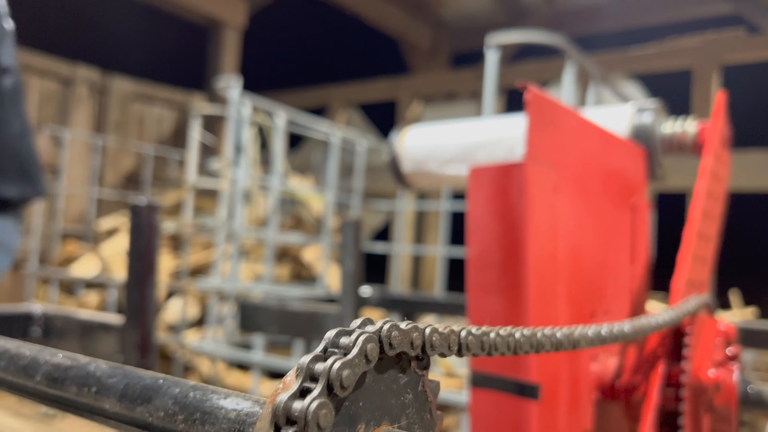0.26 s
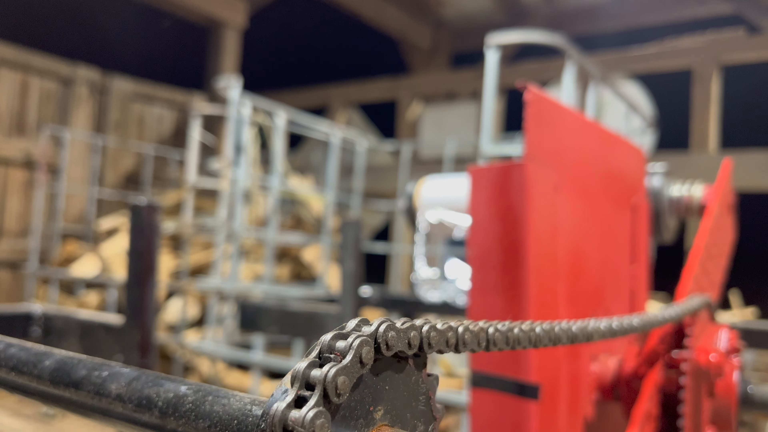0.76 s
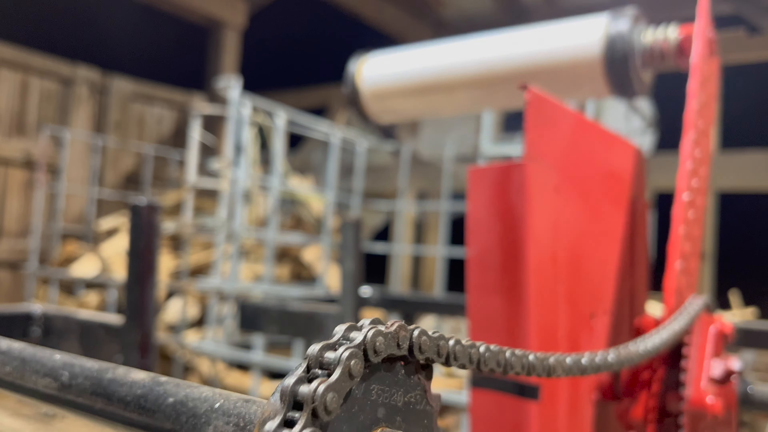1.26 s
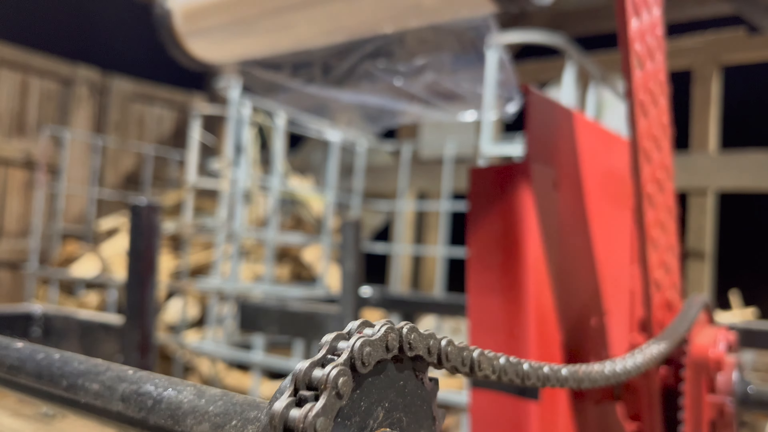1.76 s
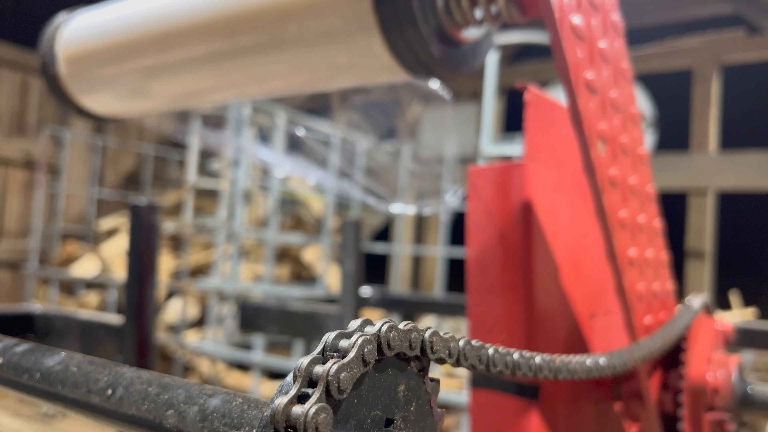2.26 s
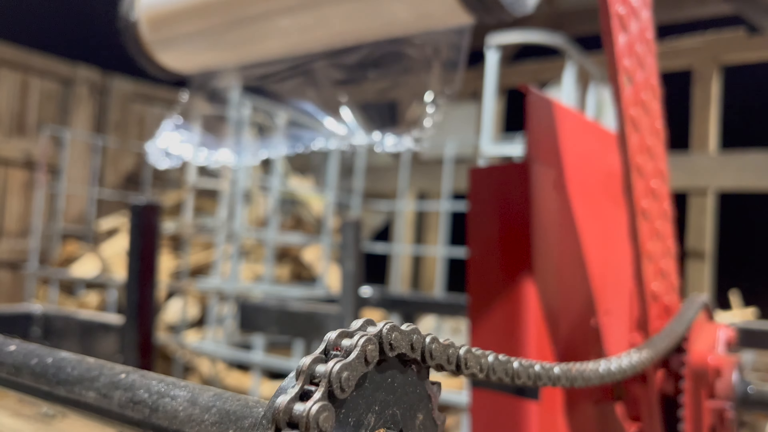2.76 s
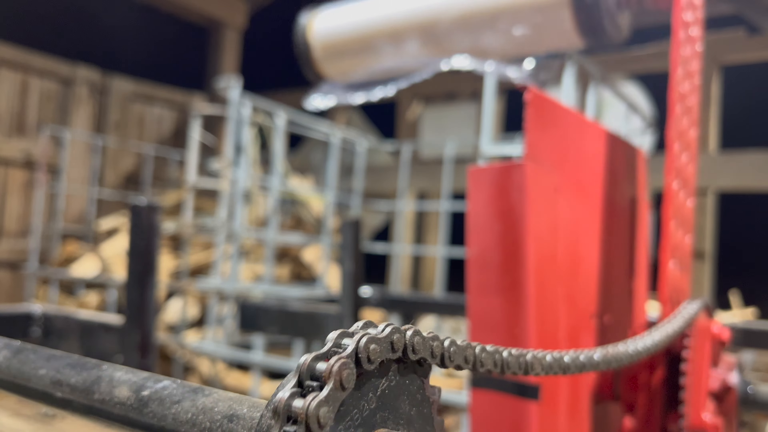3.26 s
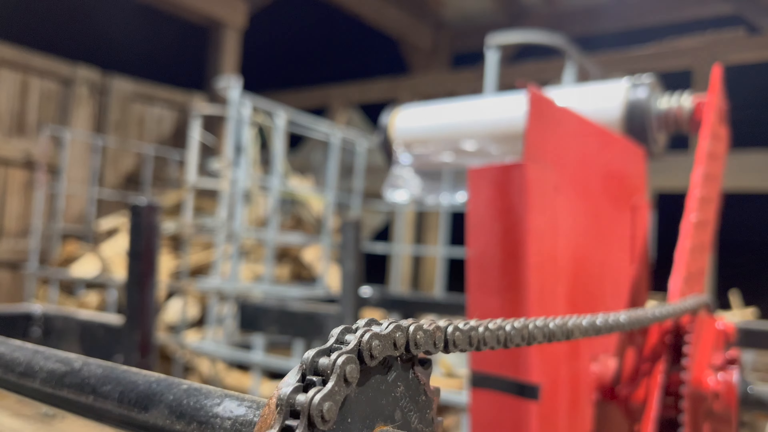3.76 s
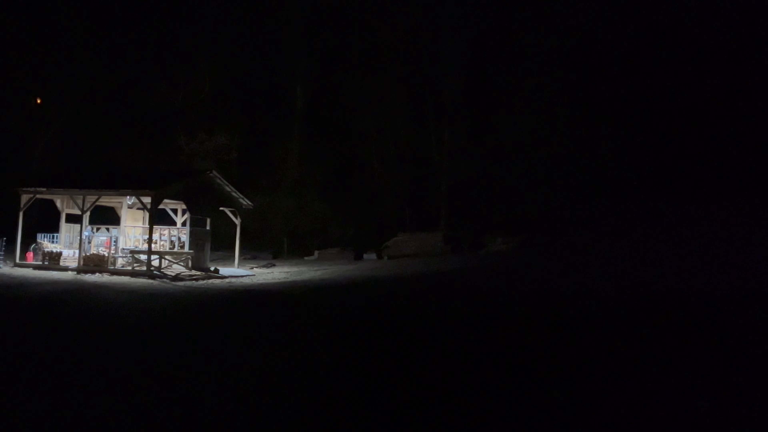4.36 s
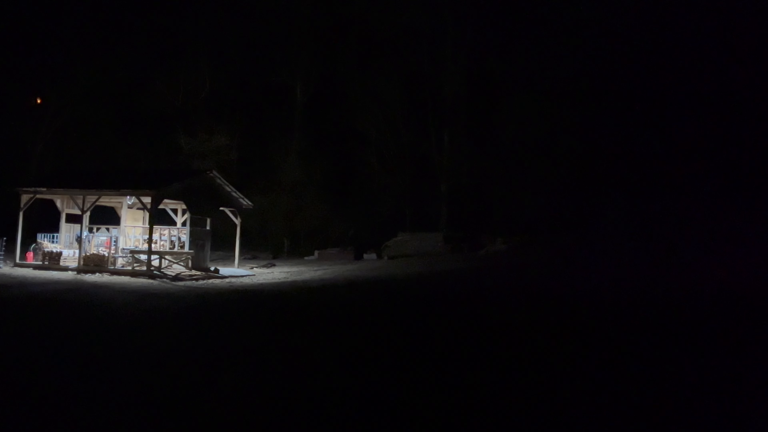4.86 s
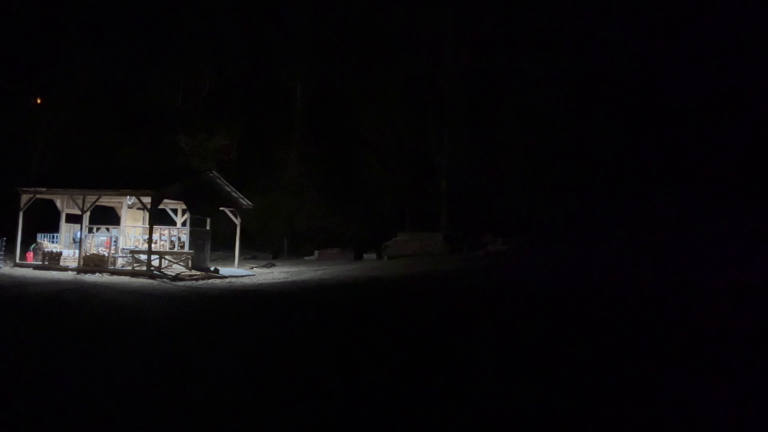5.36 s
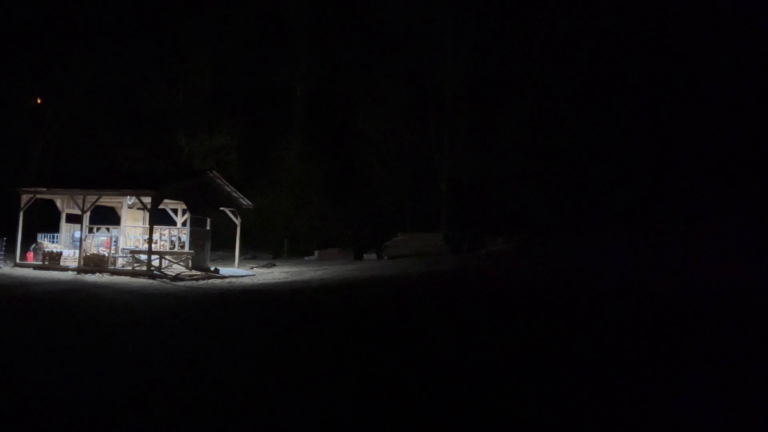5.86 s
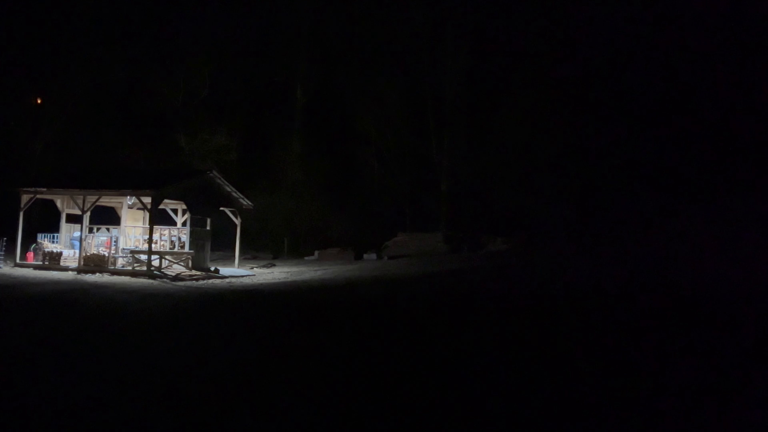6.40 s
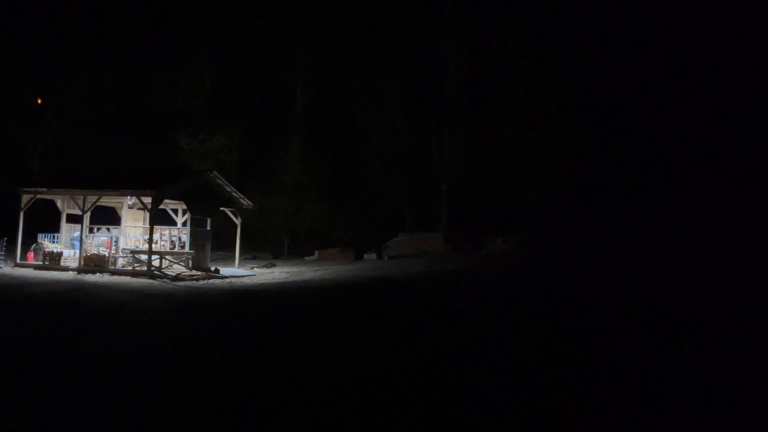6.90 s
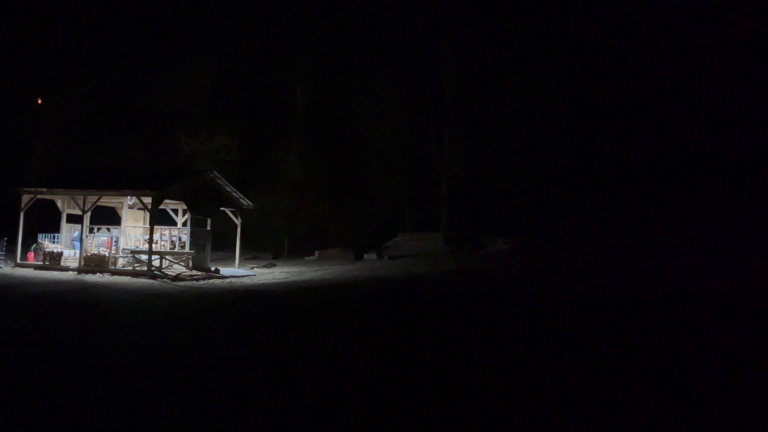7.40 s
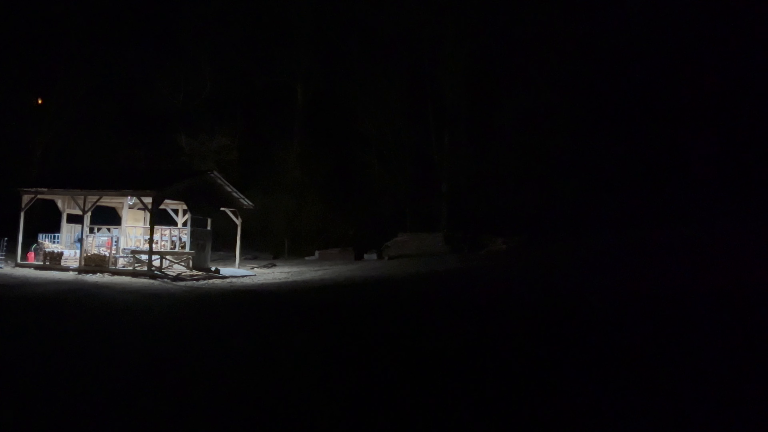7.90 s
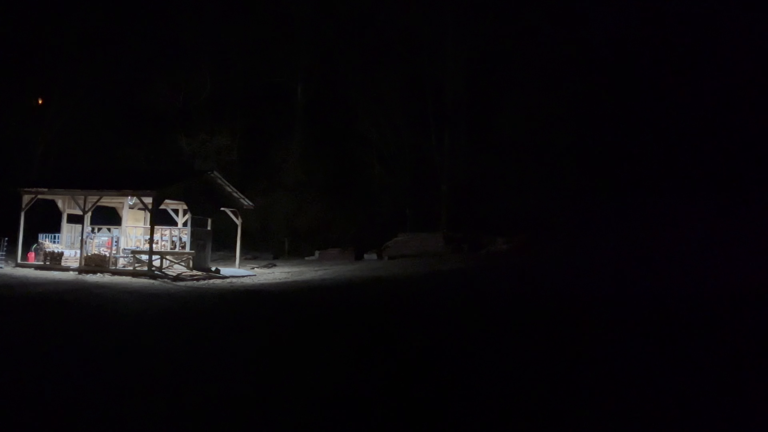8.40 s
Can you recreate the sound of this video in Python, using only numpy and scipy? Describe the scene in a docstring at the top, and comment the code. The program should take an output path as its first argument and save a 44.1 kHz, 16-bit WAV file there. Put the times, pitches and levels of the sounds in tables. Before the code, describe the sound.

In an open timber barn, film rustles quietly over a nearby bundling lever, broken early by a bright snap and heavy clunk. Midway the sound changes abruptly to firewood handling: a strong wood-on-steel clang, scattered knocks and bark crackle, a cluster of short rasping squeaks, then a duller metallic bong and final hollow tocks. Stereo pickup, faint low rumble, short reverberation.

```python
"""Split logs are knocked into a steel cradle, which rings, and shoved together with short squeaky scrapes,
as firewood is bundled in an open timber barn; before that, stretch film rustles and a bundler clunks.
Blows excite damped modes of wood, frame and steel; film and bark are streams of filtered clicks;
scrapes are stick-slip pulses through resonances. A low noise rumble lies under it all."""
import sys
import numpy as np
from scipy import signal
from scipy.fft import rfft, irfft, next_fast_len
from scipy.io import wavfile
from scipy.ndimage import map_coordinates

SR = 44100
rng = np.random.default_rng(int(sys.argv[2]) if len(sys.argv) > 2 else 0)


def pcm_store(signal):
    """Save signal as 16-bit PCM."""
    levels = np.round(np.clip(np.atleast_2d(signal), -1, 1) * 32767)
    wavfile.write(sys.argv[1], SR, levels.astype(np.int16).T)


N = 381155
TIME = np.arange(N) / SR
BLOW = TIME[:SR // 2]   # time axis of one event
CUTOFF_HZ = 15800
STACKING_FROM_S = 4.3

# dull rubbing of film roll and wood, spectrum: f/Hz, density/dB
RUBBING_SPECTRUM = [(150, 8.5), (300, 3.5), (600, 5), (1400, 5.5), (2200, 0), (3500, -53)]


def from_db(db):
    """Decibels to gain."""
    return 10 ** (np.asarray(db) / 20)


def level_one(x):
    """Scale to rms 1."""
    return x / np.sqrt(np.mean(x ** 2) + 1e-20)


def attack_one(x, size=1323):
    """Scale a sound to rms 1 over its first samples, 30 ms unless told otherwise."""
    return x / np.sqrt(np.mean(x[..., :size] ** 2) + 1e-20)


def at_hz(points, hz):
    """Read a table on a log-frequency axis."""
    f, value = np.transpose(points)
    return np.interp(np.log(np.maximum(hz, 1)), np.log(f), value)


def cut(x, hz, kind, order=2):
    """Causal Butterworth filter."""
    sections = signal.butter(order, np.minimum(hz, SR / 2 - 1000), kind, fs=SR, output="sos")
    return signal.sosfilt(sections, x + 1e-18)


def colour(x, gain_at):
    """Give x a smooth frequency response."""
    size = next_fast_len(x.shape[-1])
    spectrum = rfft(x, size) * gain_at(np.fft.rfftfreq(size, 1 / SR))
    return irfft(spectrum, size)[..., :x.shape[-1]]


def lean(x, balance):
    """Tilt the sound to one side, frequency by frequency."""
    sides = np.array([[1], [-1]])
    return colour(x, lambda hz: from_db(at_hz(balance, hz) * sides / 2))


def two_ears(pair):
    """Two unrelated signals become left and right, most alike in the bass."""
    # stereo likeness: f/Hz, left-right correlation/1
    likeness = [(60, 0.94), (150, 0.88), (350, 0.22), (900, 0.046), (4000, 0.24), (9000, 0.017),
                (12000, 0.41)]
    alike = lambda hz: np.clip(at_hz(likeness, hz), 0, .99)
    middle = colour(pair[0], lambda hz: np.sqrt(1 + alike(hz)))
    side = colour(pair[1], lambda hz: np.sqrt(1 - alike(hz)))
    return middle + side * [[1], [-1]]


def from_left(x, size=17):
    """Sound from the left reaches the right microphone some samples later."""
    return np.stack([x[0], np.pad(x[1], (size, 0))[:N]])


def add(out, s, sound, pan_db=0):
    """Mix a sound in at its time and side; pan_db is left minus right."""
    at = max(round(s * SR), 0)
    sides = from_db(np.array([[pan_db], [-pan_db]]) / 2)
    out[:, at:at + sound.shape[-1]] += (sound * sides / sides.mean())[:, :N - at]


def ringing(hz, gains, t60):
    """Response of a set of damped modes to one click."""
    decay = np.exp(-np.log(1000) * np.outer(1 / np.abs(t60), BLOW))
    return gains @ (np.sin(2 * np.pi * np.outer(hz, BLOW)) * decay)


def strike(touches, response):
    """Play a body's response from every touch."""
    return signal.fftconvolve(np.atleast_2d(touches), np.atleast_2d(response), axes=-1)[:, :len(BLOW)]


def contacts(settle_s, per_s, share):
    """A first touch, then lesser random ones as the rough faces settle."""
    touches = (rng.random(len(BLOW)) < per_s / SR) * rng.standard_normal(len(BLOW)) * share
    touches[0] = 1
    return touches * np.exp(-BLOW / max(settle_s, .001))


def stroke(length, roundness=0.2):
    """Pressure swells and falls over one push; less roundness gives a squarer swell."""
    return np.abs(np.sin(np.pi * np.minimum(BLOW / length, 1))) ** roundness


def effort(rows, attack_s, release_s, rest_db):
    """Each movement builds up, holds for its length and dies away exponentially; powers add over a rest level."""
    power = from_db(rest_db) ** 2
    for s, length, db in rows:
        before = np.maximum(s - TIME, 0) / attack_s
        after = np.maximum(TIME - s - length, 0) / release_s
        power = power + from_db(db) ** 2 * np.exp(-2 * np.minimum(before + after, 20))
    return np.sqrt(power)


def crack(decay_s, low_hz, high_hz):
    """The bright noise burst of fibres giving way at a contact."""
    burst = two_ears(rng.standard_normal((2, len(BLOW)))) * np.exp(-BLOW / decay_s)
    return cut(cut(burst, low_hz, "high"), high_hz, "low", order=1)


def log_body(pitch, octaves, cycles, count=22):
    """A piece's irregular modes, strongest near its pitch, fall 60 dB in `cycles` periods, unlike on each side."""
    offset = np.linspace(-1, 1, count) + rng.normal(0, 0.05, count)
    hz = pitch * 2 ** (offset * octaves)
    phase = rng.choice([0, np.pi], count) + rng.normal(0, 1.0, (2, count))
    return ringing(hz, np.exp(-2 * offset ** 2) * np.cos(phase), cycles / hz)


def grains(spectrum, per_s, spread_db):
    """A stereo stream of tiny clicks of uneven size that come in clumps, coloured and scaled to rms 1."""
    spread = np.minimum(rng.exponential(1, (2, N)), 5)
    sizes = from_db(spread_db * spread) * rng.standard_normal((2, N))
    clumps = from_db(2.5 * level_one(cut(rng.standard_normal(N), 22, "low")))   # the size drifts slowly
    clicks = sizes * clumps * (rng.random((2, N)) < per_s / SR)
    return level_one(colour(two_ears(clicks), lambda hz: from_db(at_hz(spectrum, hz))))


def rumble(trim_db=2):
    """Dull low noise, nearly the same in both ears, whose level follows a curve."""
    # level curve: t/s, level before trim/dB
    levels = [(0, -69), (1.15, -69.5), (1.55, -55.5), (4.25, -61.5), (4.45, -51), (8.64, -49.5)]
    # rumble spectrum: f/Hz, density/dB
    spectrum = [(24, -32), (38, -2), (58, 5.5), (110, 3.5), (170, -10), (260, -14.5), (500, -19.5),
                (1500, -49.5)]
    noise = colour(two_ears(rng.standard_normal((2, N))), lambda hz: from_db(at_hz(spectrum, hz)))
    level_db = np.interp(TIME, *np.transpose(levels))
    return from_db(level_db + trim_db) * level_one(noise)


def barn(near, far, early_db, tail_db, near_tail_db, early_s=0.012):
    """Quick reflections off the machine, then a tail under the roof, shortest at the top, weaker for near sounds."""
    # reverberation of the barn: f/Hz, t60/s
    decay_times = [(100, 0.61), (400, 0.72), (1200, 0.42), (4000, 0.22), (9000, 0.33), (15000, 0.053)]
    t = TIME[:SR]
    edges = np.geomspace(120, 16000, 9)
    tail = 0
    for low, high in zip(edges, edges[1:]):
        band = cut(two_ears(rng.standard_normal((2, SR))), [low, high], "band")
        tail = tail + band * np.exp(-np.log(1000) * t / at_hz(decay_times, np.sqrt(low * high)))
    tail = tail * np.minimum(t / 0.013, 1)   # the tail builds up over 13 ms
    early = two_ears(rng.standard_normal((2, SR))) * np.exp(-t / early_s) * (t > .002)
    early = cut(early, 193, "high")

    def reflect(x, response):
        """Convolve with a response scaled to unit energy."""
        return signal.fftconvolve(x, level_one(response) / np.sqrt(SR), axes=-1)[:, :N]

    roof = reflect(from_db(near_tail_db) * near + far, tail)
    return near + far + from_db(early_db) * reflect(near + far, early) + from_db(tail_db) * roof


def film(crinkle_db=2.0, rub_db=-0.5, tick_db=-8):
    """Film crinkles with every tug, fine ticks among the crinkles, and its roll rubs with a duller sound."""
    # tugs on the film: t/s, length/s, level before the layer gains/dB
    tugs = [(0.03, 0.051, -57), (0.25, 0.16, -63.5), (0.56, 0.12, -62), (1.21, .17, -66.5),
            (1.405, 0.0051, -47), (1.47, 0.24, -56), (1.93, 0.076, -58.5), (2.16, 0.3, -66),
            (2.81, 0.16, -69), (3.54, 0.18, -64.5), (4.19, 0.15, -65)]
    # film spectrum: f/Hz, density/dB
    spectrum = [(1500, -14), (2600, -7), (4800, -12), (6500, -17.5), (8000, -26.5), (10000, -15),
                (13000, -15.5), (15500, -16.5)]
    crinkle = from_db(crinkle_db) * grains(spectrum, per_s=6000, spread_db=1.0)
    ticks = from_db(tick_db) * grains(spectrum, per_s=90, spread_db=1.5)
    rub = from_db(rub_db) * grains(RUBBING_SPECTRUM, per_s=3400, spread_db=1.5)
    # the film tightens, slackens and never quite lies still
    pull = effort(tugs, attack_s=0.025, release_s=0.078, rest_db=-74)
    return pull * (crinkle + ticks + rub)


def bark(crinkle_db=1, rub_db=-1, creak_db=-61.5):
    """Bark crinkles and wood rubs with every drag; the loaded pile keeps shifting faintly."""
    # logs dragged over the pile, bark on bark: t/s, length/s, level before the layer gains/dB
    drags = [(4.4, 0.082, -46.5), (4.71, 0.0069, -57), (4.86, 0.11, -55.5), (5.07, 0.19, -57.5),
             (5.34, 0.071, -56.5), (5.52, 0.29, -58.5), (5.99, 0.33, -56.5), (6.46, 0.17, -53),
             (6.76, .25, -53), (7.115, 0.085, -51.5), (7.48, 0.56, -66), (8.08, 0.0069, -55)]
    # bark spectrum: f/Hz, density/dB
    spectrum = [(1500, -10.5), (2600, 7.5), (4800, 0.5), (7000, -3.5), (10000, -3), (13000, -6),
                (15500, -18)]
    crinkle = from_db(crinkle_db) * grains(spectrum, per_s=8400, spread_db=0.5)
    rub = from_db(rub_db) * grains(RUBBING_SPECTRUM, per_s=1700, spread_db=0.0)
    pile = from_db(creak_db) * grains(RUBBING_SPECTRUM, per_s=3000, spread_db=2.5)
    drag = effort(drags, attack_s=0.029, release_s=0.04, rest_db=-84)
    return (drag * (crinkle + rub) + pile) * (TIME > STACKING_FROM_S)


def snaps(trim_db=-1):
    """Film lets go or a splinter breaks in a tiny cluster of clicks."""
    # snaps: t/s, peak level before trim/dB
    breaks = [(0.1, -36.5), (0.387, -46), (1.379, -27), (1.4093, -19), (1.551, -25.5), (1.649, -29.5),
              (2.375, -32.5), (4.4026, -12), (5.0687, -18), (5.984, -27)]
    out = np.zeros((2, N))
    for s, db in breaks:
        touches = contacts(settle_s=0.014, per_s=2000, share=0.17)
        snap = strike(touches, crack(decay_s=0.00083, low_hz=1510, high_hz=7050))
        add(out, s, from_db(db + trim_db) * snap / np.abs(snap).max())
    return out


def shuffles(grit_db=-8):
    """Rough faces drag and settle: splinters catch and tap the wood hundreds of times a second."""
    # drags of rough faces: t/s, length/s, level of the wood/dB
    slides = [(2.363, 0.057, -61), (2.805, 0.066, -56.5), (3.012, 0.041, -49.5), (3.897, 0.11, -57.5),
              (5.654, 0.06, -48), (6.022, 0.072, -46.5)]
    out = np.zeros((2, N))
    for s, length, db in slides:
        size = int(length * SR)
        catches = (rng.random(len(BLOW)) < 900 / SR) * rng.standard_normal(len(BLOW))
        catches = catches * stroke(length, roundness=0.39)
        wood = attack_one(strike(catches, log_body(1410, octaves=2.58, cycles=3.8, count=34)), size)
        grit = attack_one(strike(catches, crack(decay_s=0.00022, low_hz=2130, high_hz=2770)), size)
        add(out, s, from_db(db) * (wood + from_db(grit_db) * grit))
    return out


def tocks():
    """A light, clean tap rings one narrow cluster of a piece's modes."""
    # light, hollow taps: t/s, level over the first 30 ms/dB, pitch/Hz
    taps = [(1.388, -48.5, 1910), (1.553, -50.5, 3100), (4.851, -58, 1920), (4.876, -56.5, 2100),
            (5.654, -51, 1550), (5.724, -48, 2210), (5.879, -47, 3600), (5.903, -48.5, 1475),
            (5.942, -51.5, 1530), (6.034, -47.5, 1365), (7.712, -49.5, 1250), (7.755, -54, 1260),
            (8.221, -38.5, 1330)]
    out = np.zeros((2, N))
    for s, db, pitch in taps:
        touches = contacts(settle_s=0.01, per_s=200, share=0.35)
        wood = log_body(pitch, octaves=0.626, cycles=36, count=9)
        add(out, s, from_db(db) * attack_one(strike(touches, wood)))
    return out


def scrapes(grit=1.0, unevenness=0.27, bend_s=0.017):
    """Stick and slip: even slips squeak, uneven ones rasp; slips and resonances bend together to a final pitch."""
    # log sliding on log: t/s, length/s, level/dB, final slip rate/Hz, rise/octaves,
    # slip irregularity/octaves, brightness/Hz, pitch factor of the resonances/1
    slides = [(5.065, 0.0091, -35.5, 820, 0.026, 0.12, 14200, 1),
              (6.105, 0.032, -41.5, 6750, 0.29, 0.015, 7000, 1.4),
              (6.125, 0.017, -35, 1686, 0.06, 0.015, 3980, 1.04),
              (6.572, 0.029, -35, 1070, -0.3, 0.063, 990, 0.96),
              (6.748, 0.012, -32, 1900, 0.043, 0.074, 11900, 1.13),
              (6.76, 0.059, -31.5, 903, 0.23, 0.037, 12500, 1.04),
              (7.103, 0.05, -34.5, 880, 0.089, 0.093, 5400, 1.04)]
    # resonances of the rubbed wood, before factor and bend: f/Hz, width/Hz, gain/dB
    resonances = [(1500, 520, -13.5), (2000, 154, 1.5), (3380, 2250, 0), (4330, 470, 5.5), (4830, 530, -2),
                  (8570, 1700, 1.5), (11740, 1700, -0.5)]
    out = np.zeros((2, N))
    for s, length, db, rate, rise, uneven, bright_hz, scale in slides:
        wobble, grip = (level_one(cut(rng.standard_normal(len(BLOW)), hz, "low")) for hz in (500, 150))
        cycles = np.cumsum(rate * 2 ** (uneven * wobble)) / SR
        slips = np.diff(np.floor(cycles), prepend=0)   # one pulse a cycle
        rasp = grit * uneven * rng.standard_normal((2, len(BLOW)))
        force = (slips + rasp) * stroke(length) * np.exp(unevenness * grip) + 1e-18
        sound = 0
        for k, (hz, width, gain_db) in enumerate(resonances):
            peak = signal.iirpeak(min(hz * scale, CUTOFF_HZ), hz / width, SR)
            sound = sound + (-1) ** k * from_db(gain_db) * signal.lfilter(*peak, force)
        # changing the playback speed bends everything at once
        bend = 2 ** (-rise * np.exp(-(BLOW / bend_s) ** 3))
        sound = np.array([map_coordinates(side, [np.cumsum(bend)]) for side in sound])
        sound = cut(sound, bright_hz, "low", order=1)
        add(out, s, from_db(db) * attack_one(sound, size=int(length * SR)))
    return out


def clangs(twin_db=-5):
    """A log chatters on the cradle; where it lands sets which modes ring, each with its own polarity per side."""
    # logs hitting the steel cradle: t/s, level over the first 30 ms/dB, centre of the excited modes/Hz,
    # their spread/octaves, left minus right/dB
    hits = [(4.430, -26.5, 940, 0.63, -7.5), (4.453, -37.5, 1020, 0.46, 10), (6.036, -42.5, 320, 0.2, 0),
            (6.226, -49, 1160, 0.11, -2), (6.578, -45.5, 1260, 0.18, -5), (7.813, -34.5, 580, 0.4, -2.5),
            (8.223, -45.5, 1400, 0.9, 1)]
    # cradle modes: f/Hz, level/dB, t60/s
    cradle = [(296, -4, .55), (511, -7, .2), (544, -10, .2), (668, -3, .28), (786, -5, .24), (891, -4, .3),
              (960, 1, .25), (1061, -7, .22), (1170, -9, .22), (1345, -8, .16), (1412, -5, .2),
              (1800, -14, .22)]
    out = np.zeros((2, N))
    hz, mode_db, t60 = np.transpose(cradle)
    for s, db, centre, spread, pan in hits:
        touches = contacts(settle_s=0.024, per_s=400, share=0.16)
        at = np.flatnonzero(touches)
        # how well the chatter drives each mode; dividing by it evens the modes out
        drive = np.abs(np.exp(2j * np.pi * np.outer(hz, BLOW[at])) @ touches[at])
        uptake = np.maximum(drive, .5)
        nearness = np.exp(-.5 * (np.log2(hz / centre) / spread) ** 2)
        gains = from_db(mode_db) * nearness * rng.choice([-1, 1], (2, len(hz)))
        # a second, randomly detuned set of modes with half the decay time thickens the ring
        twins = hz * rng.normal(1, 0.0493, len(hz))
        steel = ringing(hz, gains / uptake, t60) + from_db(twin_db) * ringing(twins, gains[::-1], t60 / 2)
        add(out, s, from_db(db) * attack_one(strike(touches, steel)), pan)
    return out


def rebounds(rows, later_s=.019, dull_db=4.5):
    """A piece lands on one end, then on the other with less clack and crack."""
    hits = []
    for s, db, thud, clack, bright, again in rows:
        hits.append((s, db, thud, clack, bright))
        hits.append((s + later_s, db + again, thud, clack - dull_db / 2, bright - dull_db))
    return hits


def knocks(rows, pan_db, body_hz, clack_hz, body_db, thud_db, clack_db, crack_db, settle_s, frame_pitch=1):
    """Each knock sounds the piece's low and high modes, shakes the frame and cracks at the contact."""
    # low modes of the loaded frame, before frame_pitch: f/Hz, level/dB, t60/s
    frame_modes = [(61.3, -15, 0.71), (87.8, -3.5, 0.29), (114.3, -2.5, 0.23), (142.5, -10, 0.21),
                   (175.3, -1, 0.13), (239, -5.5, 0.057)]
    out = np.zeros((2, N))
    hz, mode_db, t60 = np.transpose(frame_modes)
    for s, db, thud, clack, bright in rows:
        touches = contacts(settle_s, per_s=260, share=.5)
        low = attack_one(strike(touches, log_body(body_hz, octaves=1.366, cycles=19.5)))
        high = attack_one(strike(touches, log_body(clack_hz, octaves=1.19, cycles=64)))
        fibres = attack_one(strike(touches, crack(decay_s=0.0055, low_hz=2450, high_hz=3600)))
        body = from_db(body_db) * low + from_db(clack + clack_db) * high + from_db(bright + crack_db) * fibres
        frame_gains = from_db(mode_db + rng.normal(0, 0.65, len(hz))) * rng.choice([-1, 1], len(hz))
        frame = ringing(hz * frame_pitch, frame_gains, t60)
        add(out, s, from_db(db) * body, pan_db)
        add(out, s, from_db(db + thud + thud_db) * attack_one(frame))
    return out


def bundler_clunks():
    """The hand-worked bundler clunks: low and high modes, frame thud and a weak crack."""
    # clunks: t/s, reference level/dB, then before the layer gains thud/dB, clack/dB and crack/dB
    # re reference, and second landing/dB re first
    clunks = [(0.53, -50.5, -10.5, -8.5, -15, -8), (1.104, -49, -1, -13.5, -38, -24),
              (1.39, -38.5, -23, -3, -12, 2), (1.413, -25, -20, -16, -15, -6),
              (1.426, -24.5, -4.5, -13, -7, -2.5), (3.012, -45.5, -3, 2, -2, -5.5),
              (3.471, -40, -5.5, -27, -45, -16), (3.92, -43.5, -1.5, -20, -12, -11)]
    return knocks(rebounds(clunks), pan_db=0.0, body_hz=482.4, clack_hz=1595, body_db=-9.0, thud_db=-2.0,
                  clack_db=-2.5, crack_db=-15.0, settle_s=0.0064, frame_pitch=1.1)


def log_knocks():
    """Split logs knock into place: lower modes than the bundler's and a longer settling of touches."""
    # knocks of logs: t/s, reference level/dB, then before the layer gains thud/dB, clack/dB and crack/dB
    # re reference, and second landing/dB re first
    landings = [(4.33, -37.5, -14, -19, -23, -18), (4.39, -31, -13, 0, -12, -1),
                (4.431, -28.5, -36, 1.5, -14, -4.5), (4.552, -42.5, -5.5, -3.5, -8.5, -2.5),
                (5.337, -36, -12, -5.5, -22, 4.5), (5.723, -29.5, -5.5, -7.5, -21.5, -11),
                (5.881, -35.5, -8.5, -15, -6, 4), (6.017, -33.5, -19, -10, -8.5, 5),
                (6.225, -39, 8.5, -10, -11, -10), (6.507, -33.5, -12, -7, -20, -11),
                (7.496, -52.5, 10.5, -8, -30, -1.5), (7.813, -30, -38, -8.5, -21, -1.5),
                (8.07, -43.5, 1.5, -5, -8, -9), (8.221, -37.5, -25, 5.5, -15, -7),
                (8.374, -36.5, 2, -11.5, -52, 0.5)]
    return knocks(rebounds(landings), pan_db=-1.0, body_hz=340.5, clack_hz=1298, body_db=-12.0, thud_db=-3.0,
                  clack_db=-7.5, crack_db=-7, settle_s=0.025)


def scene():
    """The bundler and its film stand close by on the left; blows ring under the roof, film and bark stay dry."""
    # once stacking starts, the stereo picture leans right, most around 450 Hz: f/Hz, left minus right/dB
    stack_balance = [(150, -1), (450, -4), (1200, -2.5), (2500, -3)]
    near = from_left(bundler_clunks())
    far = log_knocks() + tocks() + shuffles() + clangs() + snaps() + scrapes()
    work = barn(near, far, early_db=-1.0, tail_db=-6.5, near_tail_db=-3.5)
    work = work + from_left(film()) + bark()
    return np.where(TIME < STACKING_FROM_S, work, lean(work, stack_balance)) + rumble()


def record(dry, dip_db=-4.0):
    """The two microphones differ in the treble and share a dip near 7.6 kHz; the deepest bass and the top are cut."""
    # microphone balance: f/Hz, left minus right/dB
    mic_balance = [(200, 0.5), (1300, 0.5), (3000, 2), (5000, 10), (7000, 2.5), (9500, -1.5), (12000, 2)]
    dip = lambda hz: dip_db * np.exp(-((hz - 7600) / 900) ** 2)
    heard = colour(lean(dry, mic_balance), lambda hz: from_db(dip(hz)))
    heard = cut(heard, 38, "high", order=3)
    heard = cut(heard, 13800, "low", order=12)
    return signal.sosfilt(signal.ellip(10, .1, 80, CUTOFF_HZ, fs=SR, output="sos"), heard)


dry = scene()
out = record(dry)
pcm_store(out)
```